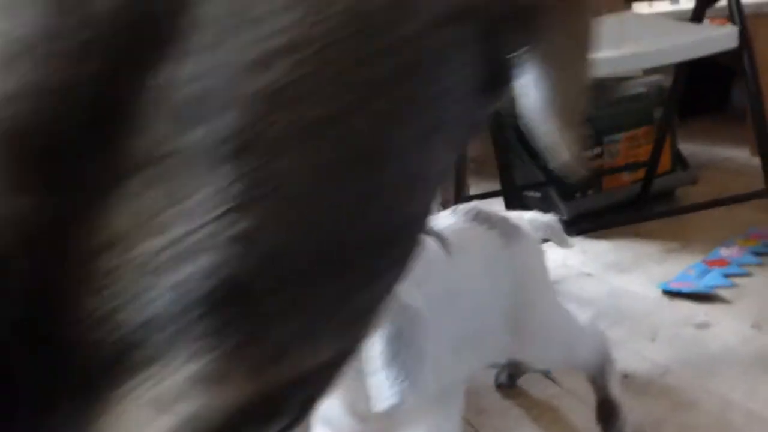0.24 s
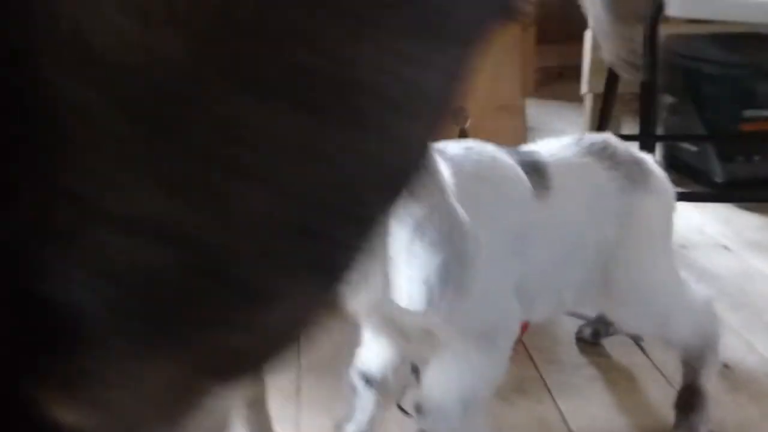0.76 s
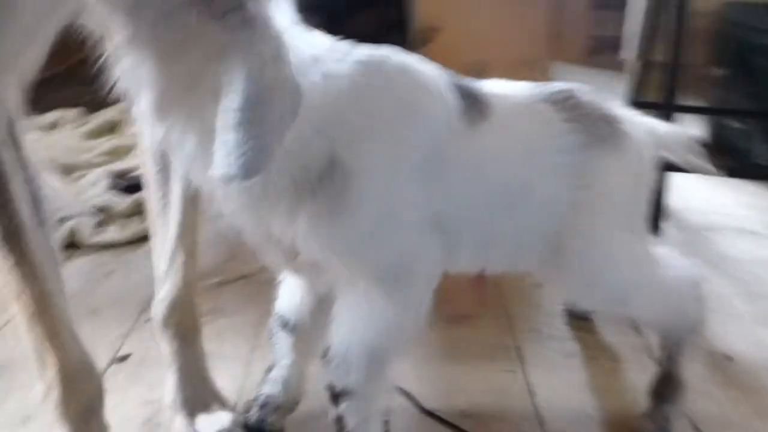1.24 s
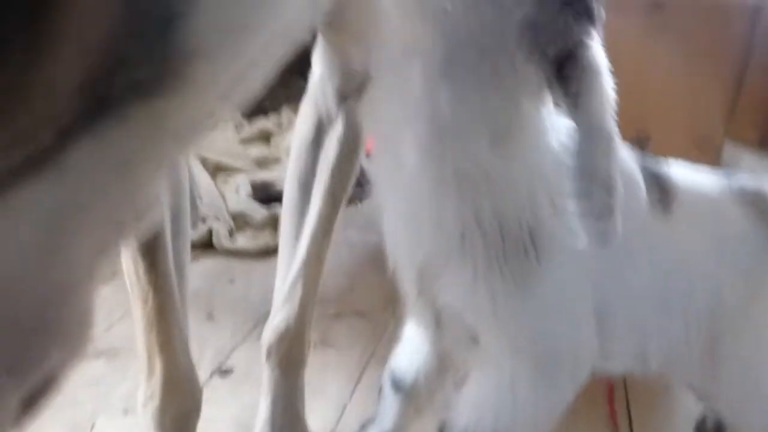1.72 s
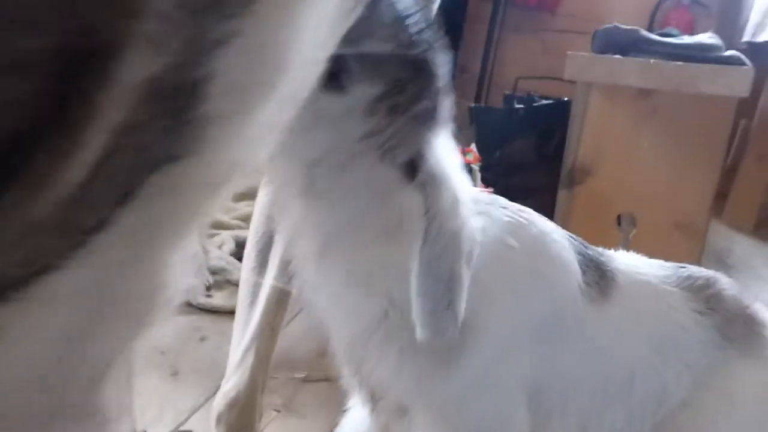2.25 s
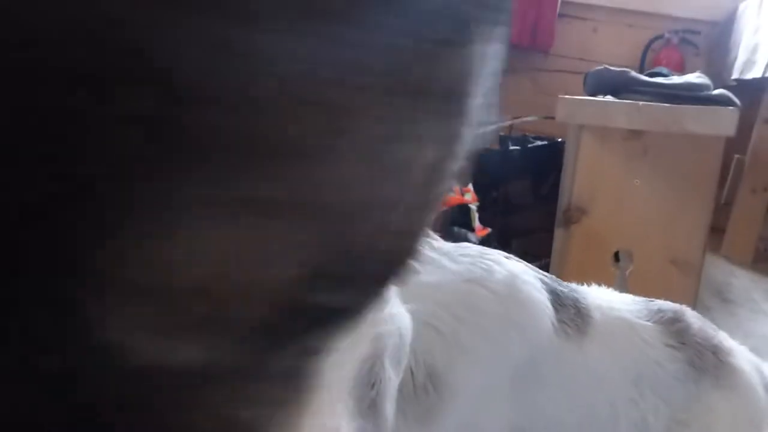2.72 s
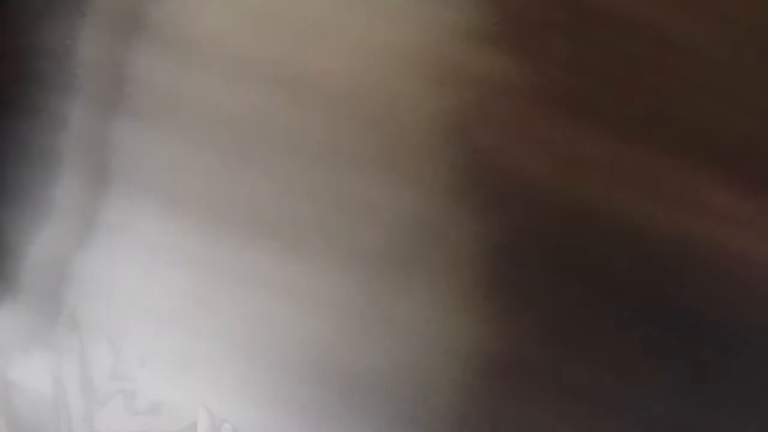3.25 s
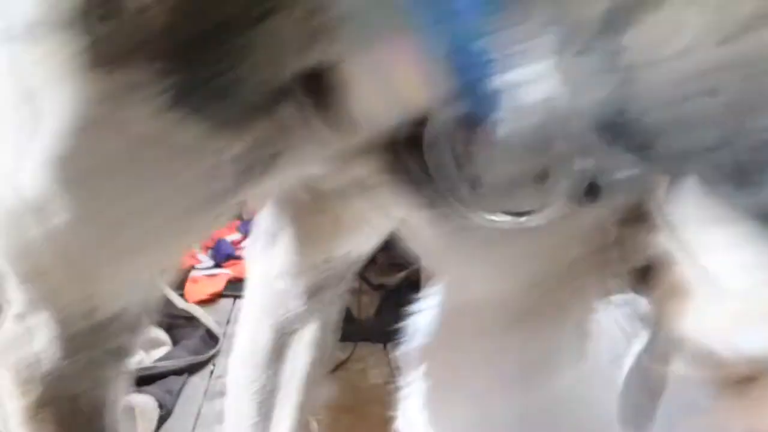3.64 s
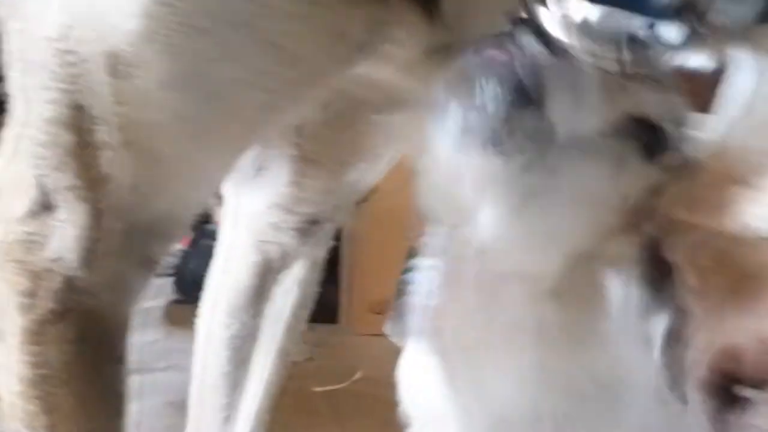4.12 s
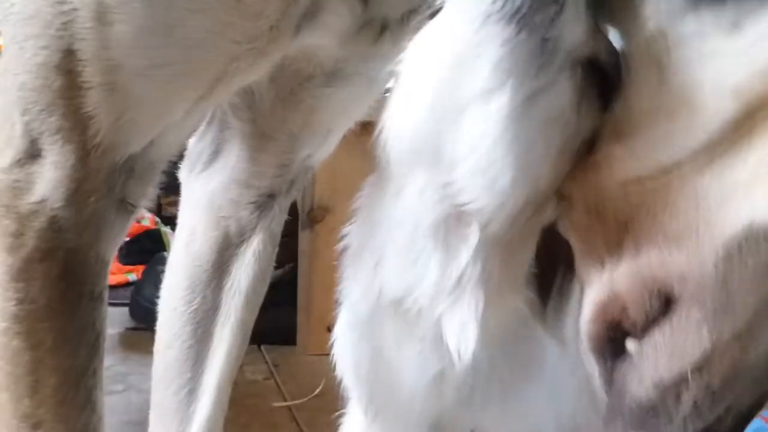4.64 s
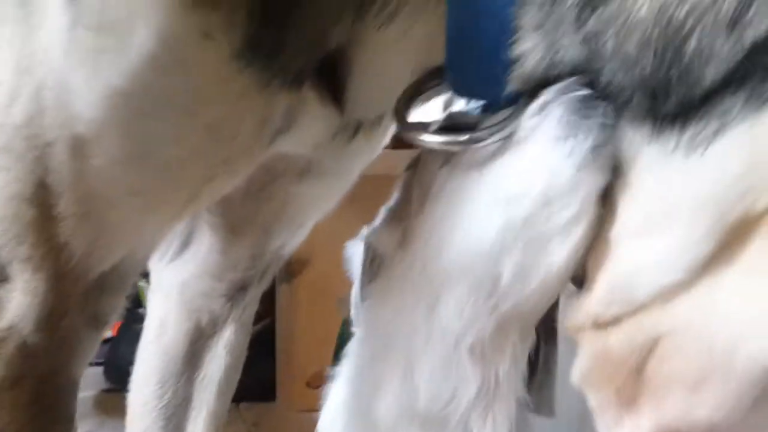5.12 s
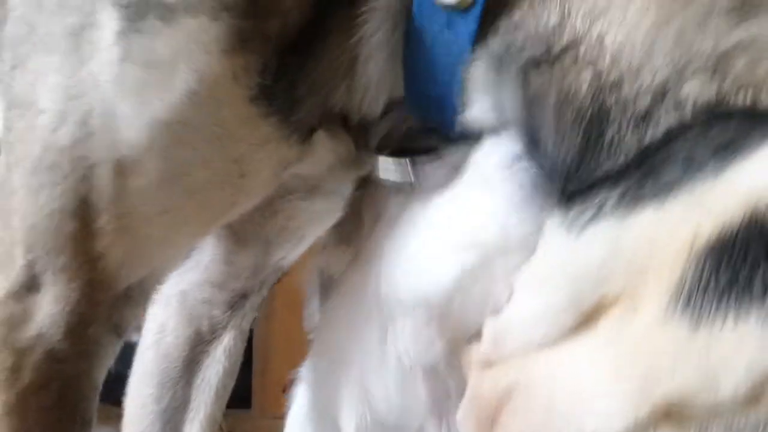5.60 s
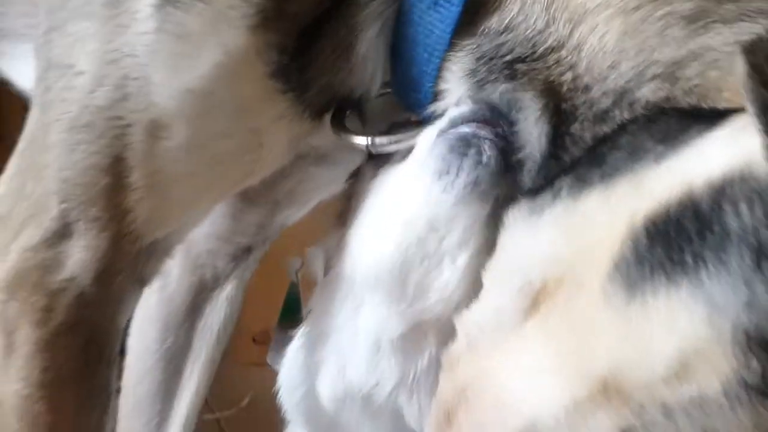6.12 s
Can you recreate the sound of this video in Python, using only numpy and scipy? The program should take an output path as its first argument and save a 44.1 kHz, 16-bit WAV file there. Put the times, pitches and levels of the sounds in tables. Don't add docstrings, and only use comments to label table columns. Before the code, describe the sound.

Claws tap and scuff on a wooden floor, a hollow knock rings, rustling calms, and close wet tongue smacks crackle against the microphone.

```python
import sys
import numpy as np
from scipy import signal
from scipy.fft import rfft
from scipy.io import wavfile
from scipy.ndimage import uniform_filter1d

SR = 44100
rng = np.random.default_rng(int(sys.argv[2]) if len(sys.argv) > 2 else 0)


def wav_record(signal):
    frames = np.transpose(np.atleast_2d(signal))
    bounded = np.clip(frames, -1, 1)
    quanta = np.round(bounded * 32767).astype(np.int16)
    wavfile.write(sys.argv[1], SR, quanta)


def field_ratio(decibels):
    return 10 ** (np.asarray(decibels, dtype=float) / 20)


N = 280917

# (time [s], peak level [dB], board pitch [Hz], room send [dB])
PAW_THUDS = [(0.369, -35.5, 485, -16), (0.636, -39, 490, -12), (0.656, -39, 520, -10),
             (0.682, -42, 500, -10), (0.727, -32, 430, -12), (0.979, -26, 540, -22), (1.036, -33, 600, -18),
             (1.039, -28, 473, -18), (1.047, -35, 700, -14), (1.085, -32.5, 470, -11),
             (1.143, -36, 407, -3.5), (1.232, -33, 298, -11), (1.329, -40, 192, -15),
             (1.383, -31.5, 310, -9), (1.409, -32, 330, -8), (1.459, -34.5, 340, -9),
             (1.546, -37, 368, -10), (1.667, -32.5, 317, -7.5), (1.915, -35.5, 416, -8.5),
             (2.073, -41, 308, -8), (2.262, -38, 436, -14), (3.039, -40.5, 427, 0), (3.099, -38, 400, -10),
             (3.249, -44, 400, 0), (3.28, -43, 330, 0), (3.318, -39, 430, 0), (3.352, -39, 320, 0),
             (3.53, -43, 430, 0), (3.61, -44, 600, 0), (3.695, -35, 360, -9), (4.141, -43.5, 330, -5),
             (4.482, -40.5, 385, -18), (4.797, -43, 700, -12), (4.828, -42, 520, -16),
             (5.081, -39.5, 604, -7), (5.873, -48.5, 210, -11), (6.142, -27, 290, -17),
             (6.153, -31, 302, -12), (6.163, -36.5, 268, -12)]
THUD_PAN_DB, PAN_PER_DB = -2, 0

# (time [s], energy level [dB], hardness [0 knock .. 3 sizzle], fall away from it [dB per range])
CLAW_CLICKS = [(0.0451, -21.5, 4, 2.5), (0.1603, -29, 6, -13), (0.2799, -21, 4, 17),
               (0.2843, -23.5, 1.5, 3), (0.3702, -16, .5, 25), (0.5218, -20, 0.34, 16),
               (0.6576, -28, 0.5, 12), (0.7304, -21, 0.2, 22), (0.983, -29, 0.5, 9), (1.0393, -23, 0.2, 15),
               (1.09, -12.5, 2, 1), (1.2924, -27, 0.5, 13), (1.4165, -25, 2, 4), (1.5504, -15.5, 0.2, 31),
               (1.6686, -19, -1.16, 10), (1.8459, -31, 1.6, 4), (1.9163, -32, -8, 11), (2.14, -26, 0, 9),
               (2.4004, -25.5, 0.8, 9), (2.315, -26.5, 0.6, 13), (2.9809, -27, 0.2, 16),
               (3.0361, -29, 0.1, 17), (3.0608, -23, 0.4, 6), (3.211, -30, 0.3, 5), (3.3202, -15, 2.4, 7),
               (3.3257, -20, 2, 5), (3.6986, -34.5, .4, 3)]
# (time [s], level [dB])
STRAW_CRACKS = [(1.9843, -47), (2.12, -36), (2.1432, -44), (2.1688, -43), (2.2122, -42), (2.2551, -46),
                (2.3994, -36), (2.478, -34.5), (2.4996, -36), (2.6116, -45), (2.8937, -47), (2.9126, -44),
                (3.0613, -41), (3.1092, -45)]
STRAW_HARDNESS, STRAW_FALL_DB, STRAW_DB = 2.4, 5, 8.5
# (time [s], energy
# level [dB], hardness [0 .. 3], fall away from it [dB per range])
TONGUE_TICKS = [(1.8868, -18, 1.7, 13), (1.8895, -20, 1.84, 11), (4.488, -28, 1.8, 22), (3.95, -27, .6, 14),
                (4.0218, -28, -0.1, 22), (4.0366, -23, 2.5, 18), (4.1609, -24, 2.5, 12),
                (4.3548, -15, 1.8, 20), (4.4015, -27, 1, 8), (4.4876, -15, -0.3, 22), (4.7966, -20.5, 4, 4),
                (4.8327, -36, -1.7, 6), (4.9345, -27, -1.3, 10), (5.0856, -24, .2, 12),
                (5.1605, -31, 1.2, 9), (5.5048, -42, -3, 5), (5.5385, -18, 1.8, 9), (5.5435, -27, 3, 12),
                (5.5841, -37, 2.5, 15), (5.8028, -17, 1.1, 15), (5.9781, -30, .6, 14), (6.0925, -37, -1, 8),
                (6.1361, -20.5, 1.5, 14), (6.1743, -28, 8, 0.5), (6.1883, -22, 3, 10),
                (6.2342, -31, -1, -5), (6.2392, -30.5, .8, 11), (6.3315, -21, 1.6, 10)]
# (time [s], energy level [dB])
SPIT_THREADS = [(4.1642, -20), (4.3446, -19), (4.347, -21), (4.4797, -33), (4.6626, -19.5), (4.6734, -30),
                (4.902, -31.5), (4.9172, -31), (4.927, -33), (5.2592, -27), (5.5324, -24), (5.8993, -36.5),
                (6.03, -30.5), (6.092, -37), (6.1802, -19)]
THREAD_HARDNESS, THREAD_FALL_DB = 3.38, 26
SNAP_S = .0004
# (low edge [Hz], high edge [Hz])
CONTACT_RANGES = [
    (650, 1500),
    (1500, 4000),
    (4000, 7700),
    (7900, 15000),
]
DEEPEST_DB = 26
USUAL_DB, ROOM_PER_DB = -25, -0.07

# (frequency [Hz], level [dB], decay time t60 [s])
HOLLOW_MODES = [(1826, 3.5, 0.11), (1745, -4, 0.1), (1862, -2, 0.12), (1930, -7, .09), (1236, -9, .05),
                (813, -10, .04), (2320, -12, .05), (2713, -10, .04), (3413, -12, .06)]
KNOCK_S, KNOCK_DB = 1.085, -24.5
MUFFLE_S, MUFFLE_DB = .006, -13

# (time [s], peak level [dB], pitch [Hz], length [cycles])
CAVITY_TOCKS = [(0.2788, -33, 6900, 60), (0.3702, -33, 3000, 14), (0.3705, -38, 900, 9),
                (0.523, -36, 2200, 20), (0.7295, -38, 1500, 10), (0.982, -38, 900, 6),
                (1.0885, -30, 5400, 45), (1.549, -39, 1700, 14), (1.551, -38, 700, 9),
                (3.32, -40, 1080, 14), (3.3193, -33, 5800, 50), (3.3196, -35, 9200, 70),
                (3.325, -35, 10500, 50), (3.352, -36, 420, 4), (3.0605, -42, 2600, 10),
                (2.169, -44, 4000, 8), (2.4264, -44, 3500, 10), (1.0965, -33, 1250, 25),
                (0.3446, -44, 3000, 10), (1.667, -43, 750, 12), (0.9383, -44, 2000, 10),
                (4.0205, -38, 1300, 22), (4.036, -40, 5200, 20), (4.161, -38, 5300, 30),
                (4.3543, -24, 4500, 12), (4.4008, -36, 3800, 12), (4.4872, -33, 1200, 12),
                (4.488, -43, 4600, 25), (4.7122, -29, 280, 3), (4.7124, -16, 2900, 6),
                (4.7125, -7, 12200, 14), (4.7127, -9, 9100, 22), (5.5384, -36, 4200, 10),
                (5.5433, -38, 8800, 14), (4.3545, -31, 11200, 12), (4.3545, -32, 3300, 6),
                (4.3468, -29, 10500, 14), (4.4045, -40, 10000, 25), (4.4008, -38, 900, 4),
                (4.9762, -34, 1200, 3), (4.9872, -28, 2500, 4), (5.3245, -30, 1000, 4),
                (4.796, -42, 6000, 25), (4.796, -44, 3100, 16), (5.2585, -42, 9200, 25),
                (5.5382, -28, 6100, 25), (5.8024, -27, 3000, 5), (6.1356, -33, 6000, 20),
                (6.1797, -29, 9000, 25), (6.331, -31, 6000, 20)]
LICKING_S = 3.9

# (time [s], peak level [dB], mouth ring [Hz], broad crack rel. to ring [dB], upper ring [Hz])
BUBBLE_BURSTS = [(4.71, -27, 8550, -12, 12500), (4.7125, -5, 7150, -1.5, 12300),
                 (4.7125, -3, 7700, -10, 10650), (4.7146, -9.5, 6200, -9.5, 9300),
                 (4.716, -17, 8000, -18, 10000), (4.7181, -11.5, 9400, -15, 5900),
                 (4.719, -23, 8000, -8, 3600), (4.9758, -21, 6600, -8, 11500),
                 (4.9805, -36, 6660, -8, 12500), (4.983, -35, 6830, -8, 14000),
                 (4.9857, -27, 6530, -2, 3500), (4.9871, -22, 6300, 1, 13500),
                 (4.9882, -25, 7500, 3, 12000), (5.3172, -17, 6740, -15, 10500),
                 (5.3182, -13, 8900, -14, 10700), (5.3198, -17, 7000, -12, 4000),
                 (5.3222, -13, 6800, -8, 9200), (5.3237, -15, 6000, -8, 3600),
                 (5.3246, -22, 6000, -3, 2900)]
# (frequency [Hz], level [dB])
CRACK_COLOUR = [(150, -18), (500, -12), (2000, -10), (4000, -10), (6000, -6), (9000, -17.5), (14000, -2.5),
                (16200, -12)]
RING_S, RING_LOSS_PER_DB = 0.0053, .03
# (time [s], length [s], level [dB], colour [Hz], room send [dB])
FROTH_HISSES = [(1.34, 0.073, -49, 260, -3), (0.277, .011, -39.5, 7600, 7.5), (3.19, .16, -56, 5000, 4),
                (2.93, 0.21, -54, 230, -2), (3.047, 0.1, -51, 400, -1), (4.555, .012, -52, 520, -2),
                (6.145, .05, -45, 190, -5), (3.3204, 0.017, -42, 8000, 12), (3.325, 0.045, -52, 4500, 10),
                (4.349, 0.027, -49, 6500, -6), (4.403, 0.005, -46.5, 11500, 4),
                (4.7106, .002, -31, 8900, -6), (4.7116, 0.0071, -18, 8650, -24),
                (4.98, 0.01, -43, 12300, 12), (4.985, 0.0069, -40.5, 1660, -0.5),
                (4.988, 0.013, -46, 6000, 6.5), (5.07, 0.17, -62, 9500, -4), (5.099, 0.14, -59, 4000, -6),
                (5.17, .066, -62, 3600, -8), (5.15, .085, -64, 12000, -8), (1.413, .04, -55, 10500, 6),
                (1.56, .04, -62, 12000, 3), (1.8, .06, -62, 9000, 0), (1.42, .09, -56, 4200, 0),
                (0.66, .1, -60, 5000, 0), (5.311, 0.0075, -42, 5600, 5), (5.316, 0.0083, -27.5, 7740, -15),
                (5.327, 0.011, -50, 6730, 0), (5.5382, 0.0025, -35, 6300, -22), (5.54, .02, -68, 6000, -2),
                (6.026, 0.029, -60.5, 5400, 0)]
# (time [s], length [s], peak level [dB], first pitch [Hz], last pitch [Hz])
SLIDING_TONES = [(4.981, .0037, -27, 6400, 6600), (4.9793, .007, -34, 4200, 3400),
                 (4.984, .004, -31, 7300, 6200), (4.9795, .005, -38, 13500, 13000),
                 (5.3163, .0035, -18, 6200, 7100), (5.3175, .0025, -11.5, 9000, 8900),
                 (5.321, .0048, -19, 7000, 6900), (5.3135, .005, -33, 3900, 3000),
                 (4.7135, .006, -20, 5600, 6000), (4.7135, .005, -39, 3300, 2800),
                 (5.5382, .0028, -26, 6400, 6700), (1.098, .031, -38, 1860, 1900),
                 (1.134, .018, -45, 1850, 1900), (2.145, .016, -43, 320, 280), (2.342, .012, -43, 450, 400),
                 (1.46, .03, -39, 330, 320), (0.86, .05, -44, 440, 420)]
# (time [s], length [s], level [dB], colour [Hz])
CLOSE_SPLASHES = [(1.084, .004, -47, 5500), (3.328, .088, -50, 9800), (3.33, .03, -50, 2800),
                  (3.37, .03, -53, 1100), (4.349, .027, -53, 11000), (4.353, .005, -42, 3000),
                  (4.722, .012, -49, 5300), (4.975, .004, -42, 3000), (4.98, .004, -44, 11000),
                  (4.9858, .0035, -34, 3700), (4.986, .003, -42, 8200), (4.986, .008, -49, 800),
                  (5.316, .004, -31, 4500), (5.322, .006, -35, 5000), (5.332, .008, -50, 3000),
                  (5.538, .003, -39, 5300), (5.538, .003, -50, 700), (6.156, .007, -52, 1000),
                  (6.331, .006, -47, 520), (6.331, .002, -44, 3500), (0.002, .045, -52, 2600),
                  (1.096, .02, -46, 1600), (4.343, .003, -42, 13500), (5.3225, .004, -37, 2100),
                  (5.335, .06, -56, 7000), (4.735, .05, -54, 7500), (5.4, .088, -58, 420)]
# (time [s], pitch [Hz], level [dB])
NOSTRIL_WHISTLE = [(6.19, 12100, -75), (6.22, 12900, -68), (6.25, 13100, -68), (6.28, 13900, -67),
                   (6.32, 15000, -70), (6.36, 15800, -76)]

# (time [s], effort [dB])
SHUFFLE_EFFORT = [(0.0, -50), (0.34, -53), (0.87, -51), (1.29, -49.5), (1.49, -46), (1.72, -58.5),
                  (1.93, -57), (2.16, -52), (2.66, -61), (2.91, -57.5), (3.44, -49.5), (3.65, -50),
                  (3.81, -55), (4.42, -55), (4.84, -63), (5.36, -55), (6.01, -61.5), (6.37, -55.5)]
# (time [s], effort [dB], distance [m])
RUB_EFFORT = [(0.0, -49.5, 0.93), (0.43, -54, 1.62), (1.28, -51.5, 1.56), (1.42, -49.5, 1.2),
              (1.65, -57.5, 1.4), (1.9, -60.5, 1.56), (2.32, -53.5, 1.2), (2.68, -60, 1.7),
              (2.87, -62.5, 1.14), (3.44, -54, 1.05), (3.83, -59.5, 1.44), (4.25, -55, 2.1),
              (4.47, -58.5, 1.5), (4.97, -64.5, 1.3), (5.2, -58.5, 1.57), (5.6, -60.5, 1.6),
              (6.08, -61.5, 1.6), (6.37, -53.5, 2.4)]
CALM_DB = -55
# (usual level [dB], share of the shuffle, share of the rub, rise per halving of distance [dB])
RUSTLE_LAYERS = [
    (-55.5, 1, .05, 0),
    (-53, 0.64, 0.46, -5),
    (-56, 0.15, 0.88, .5),
    (-60, 0.046, 0.87, 5),
]
# (frequency [Hz], level [dB per Hz])
RUSTLE_COLOUR = [(170, -0.5), (335, 2), (427, 1), (850, -9), (5000, -26), (8140, -36), (9840, -35),
                 (15300, -47.5)]
TOP_HZ = 15250
CRACKLE_PER_S, CRACKLE_DB, CRACKLE_SPREAD_DB, CRACKLE_HZ = 110, 3, 4, 4000

WALL_S, WALL_DB, WALL_HZ = .0162, -21, 6600
# (frequency [Hz], decay time t60 [s])
ROOM_DECAY = [(150, 0.5), (500, 0.38), (2000, 0.27), (6000, 0.19), (12000, 0.11), (16000, 0.12)]
# (frequency [Hz], level [dB per Hz])
HUM_COLOUR = [(12, -58), (20, -21), (48, -29), (160, 6.5), (260, 0), (340, -34), (570, -120)]
HUM_DB = -66
# (frequency [Hz], left-right likeness [0 .. 1])
PORT_LIKENESS = [(60, 0.37), (130, 0.91), (290, 0.98), (640, 0.68), (1410, 0.066), (3100, 0.51),
                 (6820, 0.52), (15000, 0.35)]
SHELF_HZ, SHELF_DB = 15400, -7


def peaked(x):
    return x / abs(x).max()


def evened(x):
    return x / np.sqrt(np.mean(x ** 2) + 1e-20)


def read(points, hz):
    f, value = np.transpose(points)
    return np.interp(np.log(hz + 1), np.log(f + 1), value)


def add(mix, s, sound, pan_db=0.):
    for part, side in zip(mix, (1, -1)):
        start = round(s * SR - side * pan_db * .3)
        part = part[start:][:len(sound)]
        part += field_ratio(side * pan_db / 2) * sound[:len(part)]


def diffuse(frames, size):
    hz = np.fft.rfftfreq(size, 1 / SR)
    a, b, c, d = rng.standard_normal((frames, len(hz), 4)).T
    same = np.clip(read(PORT_LIKENESS, hz), -1, 1)[:, None]
    left = a + 1j * b
    right = same * left + np.sqrt(1 - same ** 2) * (c + 1j * d)
    return hz, np.array([left, right])


def causal(db, size):
    both_sides = np.r_[db, db[-2:0:-1]]
    log_gain = np.log(field_ratio(np.maximum(both_sides, -100)))
    spectrum = np.exp(log_gain - 1j * signal.hilbert(log_gain).imag)
    return peaked(np.fft.ifft(spectrum).real[:size])


def hump(hz, octaves):
    f = np.fft.rfftfreq(2048, 1 / SR) + 5
    return causal(np.maximum(-6 * (np.log2(f / hz) / octaves) ** 2, -60), size=900)


def ring(hz, t60, rise=.0004):
    t = np.arange(int(SR * t60) + 9) / SR
    return np.sin(2 * np.pi * hz * t) * field_ratio(-60 * t / t60) * (1 - np.exp(-t / rise))


def puff(spit, length, db, hz):
    soft_top = signal.cheby2(10, 30, TOP_HZ + 250, fs=SR, output="sos")
    coloured = np.convolve(spit, hump(hz, 0.6), "same")
    hiss = evened(signal.sosfilt(soft_top, coloured))[:int(length * SR)]
    return field_ratio(db) * hiss * signal.windows.tukey(len(hiss), min(0.26 + 3 * length, 1))


def thuds():
    dry, wet = np.zeros((2, 2, N))
    grits = rng.standard_normal((len(PAW_THUDS), 600))
    for (s, db, hz, room_db), grit in zip(PAW_THUDS, grits):
        pad = 0.083 * grit * np.exp(-np.arange(len(grit)) / SR / 0.0052)
        pad[0] = 1
        sound = field_ratio(db + 1.5) * peaked(np.convolve(pad, hump(hz, 0.54)))
        add(dry, s + 0.002, sound, THUD_PAN_DB + PAN_PER_DB * (db + 41))
        add(wet, s + 0.0023, field_ratio(room_db) * sound)
    return dry, wet


def claws(rows, skid, lead, pan_db, room_db):
    dry, wet = np.zeros((2, 2, N))
    bands = [signal.butter(3, edges, "band", fs=SR, output="sos") for edges in CONTACT_RANGES]
    grits = rng.standard_normal((len(rows), 700))
    for (s, db, hardness, fall_db), grit in zip(rows, grits):
        ranges_away = abs(np.arange(4) - hardness) - .5
        levels = db - np.clip(fall_db * ranges_away, 0, DEEPEST_DB)
        slips = grit ** 3 * np.exp(-np.arange(len(grit)) / SR / skid)
        slips[0] = 5
        parts = [(-1) ** k * signal.sosfilt(band, slips) for k, band in enumerate(bands)]
        sound = sum(field_ratio(level) * part / np.linalg.norm(part) for level, part in zip(levels, parts))
        add(dry, s - lead, sound, pan_db)
        add(wet, s - lead, field_ratio(room_db + ROOM_PER_DB * (db - USUAL_DB)) * sound)
    return dry, wet


def knock():
    dry = np.zeros((2, N))
    for hz, db, t60 in HOLLOW_MODES:
        sound = ring(hz, t60, 0.0025)
        t = np.arange(len(sound)) / SR
        choke_db = MUFFLE_DB * np.clip((t - MUFFLE_S) / .0015, 0, 1)
        add(dry, KNOCK_S, field_ratio(KNOCK_DB + db + choke_db) * sound, 3.0)
    return dry


def tocks():
    dry = np.zeros((2, N))
    for s, db, hz, cycles in CAVITY_TOCKS:
        add(dry, s, field_ratio(db) * peaked(ring(hz, cycles / hz, 0.0003)))
    room_db = np.where(np.arange(N) < LICKING_S * SR, -8, -22)
    return dry, field_ratio(room_db) * dry


def smacks():
    dry, wet = np.zeros((2, 2, N))
    crack = causal(read(CRACK_COLOUR, np.fft.rfftfreq(1024, 1 / SR)), size=300)
    sprays = rng.standard_normal((len(BUBBLE_BURSTS), 64))
    for (s, db, hz, crack_db, upper_hz), spray in zip(BUBBLE_BURSTS, sprays):
        t60 = RING_S * np.exp(-RING_LOSS_PER_DB * (crack_db + 6))
        add(dry, s, field_ratio(db + 4.0) * ring(hz, t60, 0.00061))
        add(dry, s, field_ratio(db - 3.5) * ring(upper_hz, 0.85 * t60, 0.00006))
        droplets = spray * np.exp(-np.arange(len(spray)) / SR / 0.00031)
        add(dry, s, field_ratio(db + crack_db) * peaked(np.convolve(droplets, crack)))
    spits = rng.standard_normal((len(FROTH_HISSES), 8000))
    for (s, length, db, hz, room_db), spit in zip(FROTH_HISSES, spits):
        hiss = puff(spit, length, db, hz)
        add(dry, s, hiss)
        add(wet, s, field_ratio(room_db - 11) * hiss)
    return dry, wet + field_ratio(-23.5) * dry


def sliding_tones():
    dry = np.zeros((2, N))
    for s, length, db, first_hz, last_hz in SLIDING_TONES:
        u = np.linspace(0, 1, int(length * SR))
        hz = last_hz + (first_hz - last_hz) * (1 - u) ** 2
        tone = np.sin(2 * np.pi * np.cumsum(hz) / SR)
        add(dry, s, field_ratio(db) * np.sin(np.pi * u) * tone)
    return dry, field_ratio(-30) * dry


def splashes():
    dry = np.zeros((2, N))
    spits = rng.standard_normal((len(CLOSE_SPLASHES), 4000))
    for (s, length, db, hz), spit in zip(CLOSE_SPLASHES, spits):
        add(dry, s, puff(spit, length, db, hz))
    return dry


def sniff():
    s, hz, db = np.transpose(NOSTRIL_WHISTLE)
    t = np.arange(s[0], s[-1], 1 / SR)
    waver_hz = 200 * evened(uniform_filter1d(rng.standard_normal(len(t)), 60))
    phase = 2 * np.pi * np.cumsum(np.interp(t, s, hz) + waver_hz) / SR
    dry = np.zeros((2, N))
    add(dry, s[0], field_ratio(np.interp(t, s, db)) * np.sin(phase))
    return dry


def rustle(patchy_db=1.86, flicker_db=1.0):
    frames = N // 128 + 5
    hz, z = diffuse(frames, size=512)
    t = np.arange(frames) * 128 / SR
    s, rub_db, far = np.transpose(RUB_EFFORT)
    shuffle = np.interp(t, *np.transpose(SHUFFLE_EFFORT)) - CALM_DB
    rub = np.interp(t, s, rub_db) - CALM_DB
    halvings = -np.log2(np.interp(t, s, far) / 1.455)
    levels = np.array(RUSTLE_LAYERS) @ [np.ones(frames), shuffle, rub, halvings]

    edges = np.array([130, 700, 2500, 7500, 15000])
    centres = np.log(edges[1:] * edges[:-1]) / 2
    place = np.interp(np.log(hz + 1), centres, np.arange(4))
    share = np.maximum(1 - abs(place[:, None] - np.arange(4)), 0)
    colour_db = read(RUSTLE_COLOUR, hz)
    power = field_ratio(colour_db) ** 2
    own_db = [10 * np.log10(power[(hz >= lo) & (hz < hi)].sum()) for lo, hi in zip(edges, edges[1:])]
    field_db = colour_db[:, None] + share @ (levels - np.array(own_db)[:, None])

    grain = rng.standard_normal((frames, len(hz)))
    patches = evened(uniform_filter1d(uniform_filter1d(grain, 14, 0), 6, 1)).T
    flicker = np.minimum(rng.exponential(1, frames), 3.2) - 1
    z *= field_ratio(field_db + patchy_db * patches + flicker_db * flicker * (hz[:, None] > 900))
    z[:, (hz < 160) | (hz > TOP_HZ)] = 0
    return field_ratio(13.0) * signal.istft(z, nperseg=512, noverlap=384)[1][:, :N] / 4


def crackle():
    s, rub_db, _ = np.transpose(RUB_EFFORT)
    chance, size, side = rng.random((3, N))
    level_db = np.interp(np.arange(N) / SR, s, rub_db) + CRACKLE_DB
    level_db = level_db - CRACKLE_SPREAD_DB * np.log(size + .06)
    ticks = (chance < CRACKLE_PER_S / SR) * field_ratio(level_db) * np.array([.5 + side, 1.5 - side])
    return signal.oaconvolve(ticks, hump(CRACKLE_HZ, 0.7)[None], axes=1)[:, :N]


def wall(x):
    colour = hump(WALL_HZ, 0.3)
    colour = colour / abs(rfft(colour)).max()
    echo = np.r_[np.zeros(int(WALL_S * SR)), colour]
    near = x * (np.arange(N) > LICKING_S * SR)
    return field_ratio(WALL_DB) * signal.oaconvolve(near, echo[None], axes=1)[:, :N]


def room(x, gap=0.0005):
    hz, z = diffuse(160, size=256)
    t = np.arange(160) * 64 / SR
    z[:, hz > TOP_HZ] = 0
    decay = field_ratio(-60 * t / read(ROOM_DECAY, hz)[:, None])
    tail = signal.istft(z * decay, nperseg=256, noverlap=192)[1]
    tail *= 1 - np.exp(-(np.arange(tail.shape[1]) / SR / gap) ** 2)
    return signal.oaconvolve(x[:1], tail / np.linalg.norm(tail[0]), axes=1)[:, :N]


def hum():
    hz, z = diffuse(N // 1024 + 5, size=4096)
    z *= field_ratio(read(HUM_COLOUR, hz) - 60 * (hz > 260))[:, None]
    return field_ratio(HUM_DB + 2.5) * evened(signal.istft(z, nperseg=4096, noverlap=3072)[1][:, :N])


def self_noise():
    low_pass = signal.butter(2, 45, fs=SR, output="sos")
    return field_ratio(-58) * signal.sosfilt(low_pass, rng.standard_normal((2, N)))


def scene():
    straws = [(s, db + STRAW_DB, STRAW_HARDNESS, STRAW_FALL_DB) for s, db in STRAW_CRACKS]
    threads = [(s, db, THREAD_HARDNESS, THREAD_FALL_DB) for s, db in SPIT_THREADS]
    steps = claws(CLAW_CLICKS + straws, 0.0024, .0008, pan_db=4.0, room_db=-3.5)
    licks = claws(TONGUE_TICKS + threads, SNAP_S, 0.00022, pan_db=0.9, room_db=-14)
    dry, wet = np.sum([thuds(), steps, tocks(), smacks(), licks, sliding_tones()], axis=0)
    hollow = knock()
    close = dry + hollow + splashes() + sniff()
    answers = wall(dry) + room(wet + field_ratio(-15) * hollow)
    return close + rustle() + crackle() + answers + hum()


def roll_off(x):
    return signal.sosfilt(signal.butter(12, 16790, fs=SR, output="sos"), x)


def record(dry):
    low_cut = signal.butter(2, 70, "high", fs=SR, output="sos")
    top_cut = signal.cheby2(12, 60, 16900, fs=SR, output="sos")
    corners = [0, SHELF_HZ - 300, SHELF_HZ + 300, SR / 2]
    port = signal.firwin2(255, corners, field_ratio([0, 0, SHELF_DB, SHELF_DB]), fs=SR)
    dulled = signal.oaconvolve(dry, port[None], "same")
    heard = signal.sosfilt(top_cut, signal.sosfilt(low_cut, dulled))
    return roll_off(heard + self_noise())


dry = scene()
out = record(dry)
wav_record(out)
```